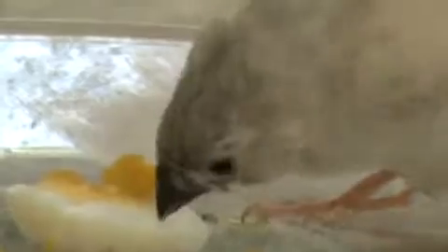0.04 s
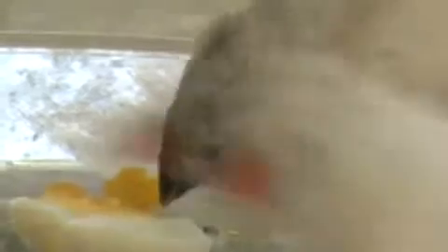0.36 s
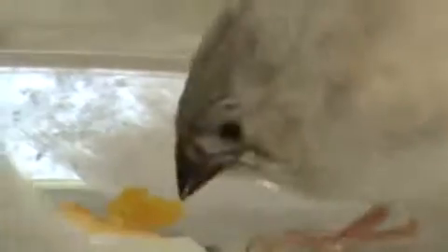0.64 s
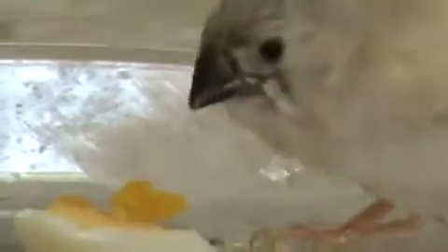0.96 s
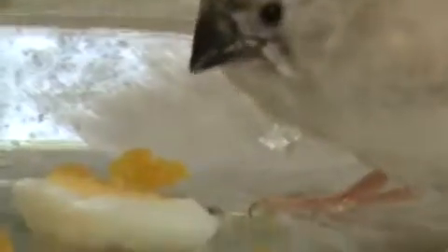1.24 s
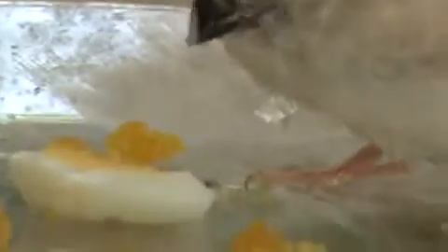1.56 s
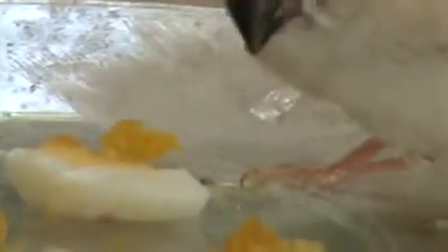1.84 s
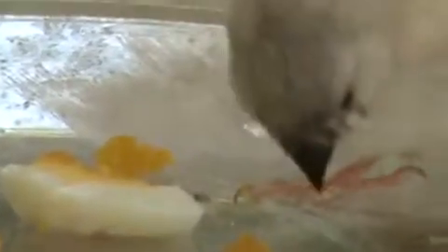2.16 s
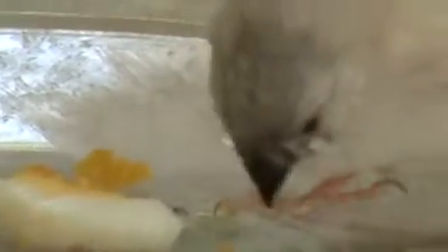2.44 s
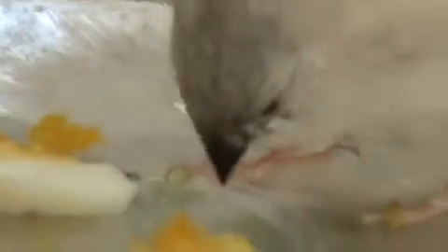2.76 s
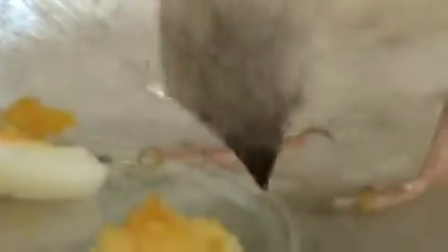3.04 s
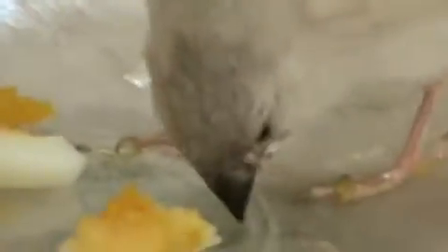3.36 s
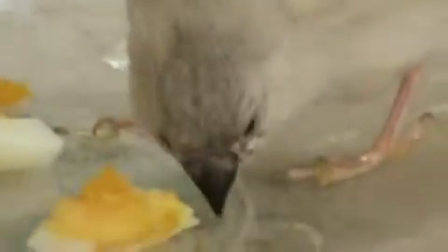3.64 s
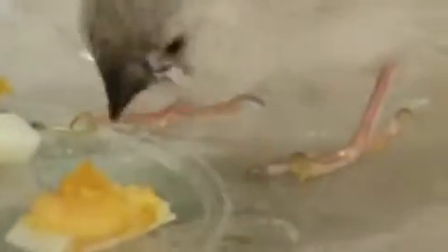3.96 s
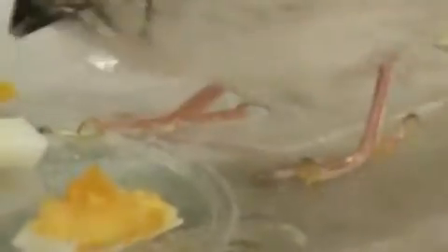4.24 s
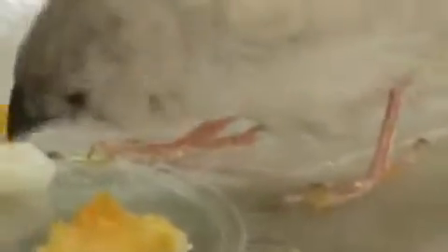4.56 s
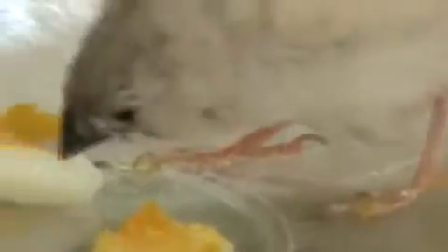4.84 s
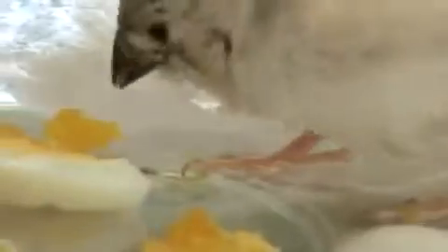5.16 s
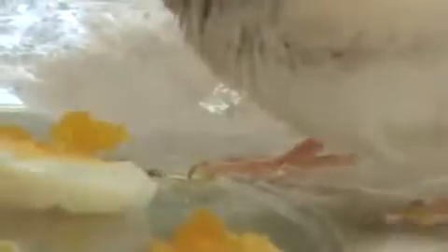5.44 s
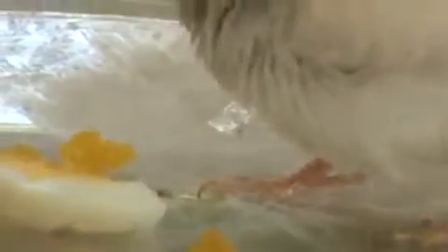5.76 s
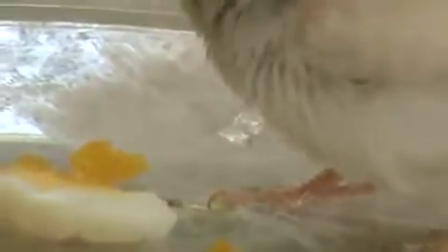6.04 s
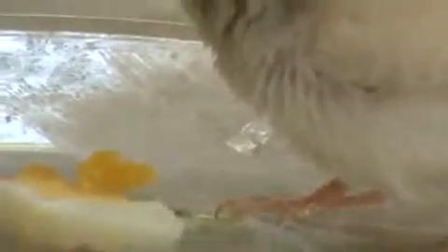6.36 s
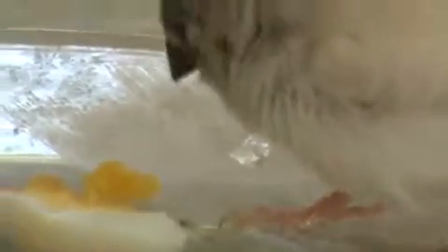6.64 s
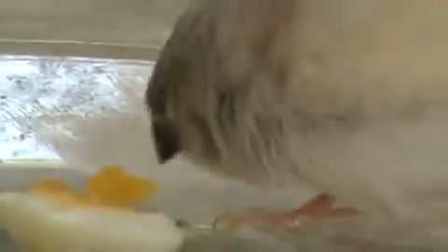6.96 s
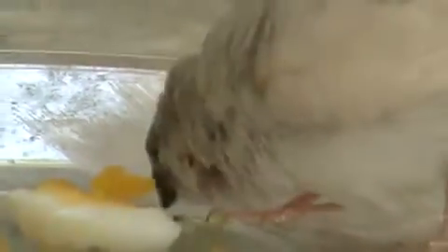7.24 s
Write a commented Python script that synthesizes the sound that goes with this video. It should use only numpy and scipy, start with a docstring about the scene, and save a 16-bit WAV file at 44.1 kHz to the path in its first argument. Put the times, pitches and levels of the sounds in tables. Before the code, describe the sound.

Indoors, a small finch repeats a quick, nasal, chirping song over light dish pecks, perch knocks and soft room air.

```python
"""A zebra finch sings indoors: runs of short nasal notes lead into its motif, a repeated tune of squeak,
buzz, chirp, whistle, rasp, two flat notes and a loud arched call. Small folds in its voice organ (the
syrinx) vibrate, and its throat and beak boost some of the overtones. A second finch answers from across
the room. Close by, a bird pecks at a dish and steps on a perch, making both ring, and shuffles its
feathers. Room air and a faint appliance hum lie underneath."""
import sys
import numpy as np
from scipy import signal
from scipy.fft import rfft, irfft, next_fast_len
from scipy.io import wavfile

SR = 44100
rng = np.random.default_rng(int(sys.argv[2]) if len(sys.argv) > 2 else 0)


def wav_record(signal):
    """Record a signal, one row per channel, as 16-bit PCM in the file named by sys.argv[1]."""
    frames = np.transpose(np.atleast_2d(signal))
    bounded = np.clip(frames, -1, 1)
    # unit amplitude maps onto the largest positive 16-bit level
    quanta = np.round(bounded * 32767).astype(np.int16)
    wavfile.write(sys.argv[1], SR, quanta)


N = 321489
TIME = np.arange(N) / SR
CUTOFF_HZ = 15900

# Levels in the tables are relative. A decay_s is the time a sound takes to fade by 60 dB.
# how alike the left and right channels are (1 = the same): frequency_hz, likeness
STEREO_LIKENESS = [(30, .99), (70, 0.99), (150, 0.94), (300, 0.61), (1000, 0.13), (5000, 0.73),
                   (9000, 0.62), (12000, 0.97)]
# how long the room echoes: frequency_hz, decay_s
ROOM_DECAY = [(200, 0.21), (1000, 0.83), (3500, 0.31), (7000, 0.29), (14000, 0.35)]
# tone colour of the room air: frequency_hz, level_db
AIR_COLOUR = [(15, -40), (25, -7.5), (120, -2.5), (242, -5.5), (384, -8), (545, -8), (624, -11.5),
              (796, -9), (911, -11), (1400, -13.5), (1740, -15.5), (2350, -21), (6560, -21), (11600, -19),
              (16000, -35.5)]
# the two tones of the appliance hum: pitch_hz, level_db
HUM_TONES = [(100, -67), (388.5, -67.5)]
# the upper hum tone swells and ebbs: time_s, level_db
HUM_SWELL = [(0, -2.5), (3.2, -7.5), (3.9, 3), (5.1, 7.5), (5.8, -4), (6.5, 5), (7.29, -10)]
# the rise and fall of the feather rustle: time_s, level_db
FEATHER_SWELL = [(5.05, -77), (5.2, -53), (5.33, -47.5), (5.44, -49.5), (5.52, -56), (5.62, -69)]
# tone colour of the feathers: frequency_hz, level_db
FEATHER_COLOUR = [(25, -19), (60, -1.5), (150, -14), (400, -10.5), (800, -11.5), (2000, -17),
                  (12000, -37.5)]

# feet and body landing on the perch: start_s, peak_db
STEPS = [(0.102, -39), (3.707, -27.5), (3.731, -28), (3.759, -35), (5.159, -48), (5.25, -33), (5.314, -38),
         (5.388, -36.5), (6.276, -32), (6.305, -28.5)]
# the beak hitting the dish: start_s, peak_db, crunch_decay_s
PECKS = [(.429, -37, 0.015), (1.662, -32, 0.02), (2.657, -32, 0.026), (3.706, -29, 0.058),
         (4.157, -35.5, 0.065), (4.195, -33.5, 0.16), (5.156, -22, 0.044), (6.494, -26.5, 0.012),
         (6.758, -35, 0.018)]
# the tones that perch and dish ring with when hit: pitch_hz, level_db, decay_s
PERCH_TONES = [(183, -10, .05), (234, 1.5, .14), (292.5, -4.5, .25), (384.6, 2, 0.31), (464, -5.5, 0.14),
               (640, -11, .08)]
DISH_TONES = [(1006, -6.5, 0.0405), (1397, 0, 0.022), (2030, -4.5, 0.023), (2280, -2, 0.024),
              (3060, -0.5, 0.017), (3930, -6.5, 0.0074), (6330, 1, 0.0047), (7750, -41, 0.0071)]

# tone colour of each kind of bird note: frequency_hz, level_db
ANSWER_COLOUR = [(600, -10), (1250, -8.5), (1850, -13), (2450, -3.5), (3100, -5.5), (3700, -7),
                 (4400, -8.5), (6000, -20), (9000, -14.5), (14000, -43)]
SHORT_COLOUR = [(500, -1), (750, -12), (1100, 7), (1600, -3), (2200, 2.5), (3200, 1), (4200, -2),
                (5200, -6.5), (6500, 0), (7800, -7.5), (10000, -6.5), (12000, -20.5), (15000, -22)]
QUICK_COLOUR = [(600, -10), (1300, 10), (1800, 5), (2500, 4), (4200, 3.5), (6500, 1.5), (8000, -6),
                (11000, -7), (13000, -18), (15500, -27.5)]
FLAT_COLOUR = [(650, -15), (1300, -6), (1950, -10), (2600, -7), (3250, 4), (4000, -0.5), (4700, -3),
               (5300, 2.5), (6000, -0.5), (6700, -10), (8500, -13), (10500, -11), (12500, -26.5),
               (15000, -36.5)]
ARCH_COLOUR = [(1000, -6), (1350, -7), (2100, -3), (2700, -7.5), (3300, -1.5), (4100, 3), (4700, -2.5),
               (5400, -0.5), (6700, -9.5), (8500, -13), (10500, -9), (12500, -22), (15000, -60)]
# A beak_hz is the frequency that the beak boosts most.
# the far bird's calls: start_s, length_s, pitch_hz, level_db, beak_hz
ANSWERS = [(0.392, 0.071, 626, -35.5, 3100), (3.446, 0.076, 622, -35.5, 3460),
           (4.325, .078, 624.5, -39, 2390), (4.759, 0.079, 621, -38.5, 2900)]
# the singer's short notes: centre_s, length_s, pitch_hz, level_db, beak_hz
SHORT_NOTES = [(.053, .018, 811, -29, 5500), (0.168, .017, 800, -30.5, 5760), (.265, 0.017, 538, -33, 5200),
               (.36, 0.014, 570.5, -27.5, 7100), (.435, 0.021, 899, -31, 5760),
               (0.506, 0.015, 823, -31, 6800), (1.222, .016, 529, -34, 4970), (1.542, .019, 527, -28, 4570),
               (1.672, .017, 847, -31, 7600), (1.786, 0.021, 862, -29, 5900),
               (1.873, 0.015, 537, -35.5, 5740), (1.971, 0.015, 574, -30, 6900),
               (2.046, 0.018, 910, -29.5, 6300), (2.114, .017, 796, -31.5, 6600),
               (2.826, .018, 518, -32, 5460), (4.652, 0.024, 901, -37.5, 4510),
               (4.806, 0.027, 952, -35.5, 5000), (4.925, .016, 820, -28.5, 6140),
               (5.026, .015, 835, -29, 6560), (5.125, .019, 535, -35, 5070), (5.222, .018, 566, -30, 6100),
               (5.29, 0.02, 863, -29.5, 5630), (5.357, 0.014, 878, -30, 6440),
               (6.07, 0.015, 528.5, -33, 4830), (6.379, .022, 516, -28, 4300),
               (6.502, .018, 818, -29, 6700), (6.592, .02, 528, -34.5, 5560), (6.689, .018, 591, -31, 6260),
               (6.761, 0.022, 893, -29.5, 6100), (6.833, 0.017, 831, -31.5, 5800)]
# when each motif reaches its whistle: time_s
WHISTLE_TIMES = [.742, 2.353, 5.594, 7.07]
# how each quick syllable moves: offset_s, pitch_hz, level_db, beak_hz, beak_width_hz, roughness (0-1)
SQUEAK = [(-.014, 2686, -47, 2600, 1400, .15), (-.006, 2510, -44, 2600, 1400, .15),
          (-.004, 2475, -41, 7350, 1800, 0.3), (.003, 2255, -33.5, 7000, 1400, 0.2),
          (.013, 1150, -32, 6680, 1800, .75), (.032, 727, -38.5, 6790, 2620, 0.78)]
BUZZ = [(-.014, 159.8, -40.5, 3600, 1500, .5), (-.002, 164.7, -34, 4200, 1400, .4),
        (.008, 168.9, -26, 4590, 1600, .35), (.015, 165, -27, 5200, 1500, .35),
        (.025, 165.3, -32.5, 5500, 1500, 1)]
CHIRP = [(-.014, 1480, -31.5, 7900, 2990, .25), (-.009, 1440, -29, 7500, 3030, .4),
         (-.003, 1330, -34, 6000, 2600, .7)]
WHISTLE = [(-.004, 5240, -39, 5200, 2500, 0.35), (0, 4040, -25, 4150, 1500, 0.29),
           (.006, 4186, -10, 4160, 1200, .06), (0.01, 4110, -14.5, 4150, 1200, .15),
           (.018, 3910, -26, 3900, 1500, 0.69)]
RASP = [(.02, 1322, -36.5, 6680, 2000, 0.49), (0.026, 1305, -20, 6770, 2600, 0.39),
        (.038, 1200, -24.5, 6660, 4400, .5), (.047, 1060, -24, 6200, 5000, .8),
        (.056, 910, -42, 6420, 5000, .8)]
# the flat notes: start_s, length_s, pitch_hz, level_db, open_beak_hz
FLAT_NOTES = [(0.853, 0.15, 675.6, -24, 5050), (1.049, .093, 649.2, -19.5, 4420),
              (2.462, 0.15, 675.6, -24, 5240), (2.658, 0.086, 654.8, -19, 4570),
              (5.702, 0.15, 675, -23.5, 4950), (5.899, 0.082, 650, -18.5, 4150),
              (7.179, 0.13, 672.4, -23.5, 5050)]
# the loud arched calls: start_s, length_s, top_pitch_hz, level_db
ARCHED_CALLS = [(1.308, 0.14, 1375, -15), (2.907, .146, 1359, -14.5), (6.147, 0.14, 1374, -14.5)]
# how the beak moves during an arched call: offset_s, beak_hz
ARCH_BEAK = [(0, 6600), (.008, 6200), (.02, 4600), (.05, 4050), (.08, 4800), (.118, 4750), (.146, 3600)]


def from_db(db):
    """Turn decibels into a number to multiply by."""
    return 10 ** (np.asarray(db) / 20)


def rms_one(x):
    """Scale a signal so that its average power is 1."""
    return x / np.sqrt(np.mean(np.abs(x) ** 2) + 1e-20)


def at_hz(table, hz):
    """Read between the rows of a frequency table, giving each octave equal space."""
    row_hz, value = np.transpose(table)
    return np.interp(np.log(np.maximum(hz, 1)), np.log(row_hz), value)


def coloured_noise(colour):
    """Two unrelated noises with the same tone colour."""
    size = next_fast_len(N)
    gain = from_db(at_hz(colour, np.arange(size // 2 + 1) * SR / size))
    white = rng.standard_normal((2, N))
    return rms_one(irfft(rfft(white, size) * gain, size)[:, :N])


def flutter(shape, rate_hz):
    """A random wobble of typical size 1, up to about the given rate."""
    lowpass = signal.butter(2, min(rate_hz, SR / 4), fs=SR, output="sos")
    return rms_one(signal.sosfilt(lowpass, rng.standard_normal(shape)))


def add(track, start_s, sound):
    """Mix a sound into a track at the given time."""
    at = round(start_s * SR)
    part = sound[max(-at, 0):max(N - at, 0)]
    track[max(at, 0):max(at, 0) + len(part)] += part


def stereo(mid, side):
    """Blend two unrelated signals into left and right channels that are partly alike."""
    size = next_fast_len(len(mid))
    alike = np.clip(at_hz(STEREO_LIKENESS, np.arange(size // 2 + 1) * SR / size), -1, 1)
    shared = rfft(mid, size) * np.sqrt((1 + alike) / 2)
    opposite = rfft(side, size) * np.sqrt((1 - alike) / 2)
    return irfft([shared + opposite, shared - opposite], size)[:, :len(mid)]


def room(dry, near_db, tail_db, near_decay_s=0.064):
    """Add quick echoes from the cage and nearby walls, then the room's tail, longest in the mid range."""
    t = np.arange(int(0.7 * SR)) / SR
    edges_hz = np.geomspace(100, CUTOFF_HZ, num=9)
    white = rng.standard_normal((2, 2, len(t)))
    tail = 0
    for k, band in enumerate(zip(edges_hz, edges_hz[1:])):
        noise = signal.sosfilt(signal.butter(2, band, "band", fs=SR, output="sos"), white[k % 2])
        decay_s = at_hz(ROOM_DECAY, np.sqrt(band[0] * band[1]))
        tail = tail + noise * from_db(-60 * t / decay_s)
    near = rng.standard_normal((2, len(t))) * (t > 0.001) * from_db(-60 * t / near_decay_s)
    echo = from_db(near_db) * rms_one(near) + from_db(tail_db) * rms_one(tail * (t > 0.008))
    echo = stereo(*echo) / np.sqrt(len(t))
    return dry + signal.fftconvolve(dry[None], echo, axes=1)[:, :N]


def room_air(level_db=-54.5):
    """The steady, soft rush of air in the room."""
    return stereo(*(from_db(level_db) * coloured_noise(AIR_COLOUR)))


def appliance_hum():
    """Two faint, slightly wavering tones; the upper one swells and ebbs."""
    mains, upper = [from_db(db) * np.sqrt(2) * np.sin(2 * np.pi * hz * TIME + 0.5 * flutter(N, 6.4))
                    for hz, db in HUM_TONES]
    return mains + upper * from_db(np.interp(TIME, *np.transpose(HUM_SWELL)))


def feather_shuffle(flicker_db=4.7):
    """Feathers rustle once: a swell of noise with a flickering level."""
    level_db = np.interp(TIME, *np.transpose(FEATHER_SWELL)) + flicker_db * flutter(N, 30)
    return stereo(*(from_db(level_db) * coloured_noise(FEATHER_COLOUR)))


def strikes(hits, tones, gain_db, crunch_db):
    """Each hit rings an object's tones in a new random balance, over a short gritty crunch."""
    out = np.zeros(N)
    t = np.arange(SR // 3) / SR
    for start_s, peak_db, crunch_decay_s in hits:
        ring = 0
        for hz, db, decay_s in tones:
            fade = from_db(db + rng.normal(0, 4.6) - 60 * t / decay_s)
            ring = ring + fade * np.sin(2 * np.pi * hz * t) * rng.choice([-1, 1])
        crunch = from_db(crunch_db - 60 * t / crunch_decay_s) * flutter(len(t), 7100)
        hit = ring + crunch
        add(out, start_s, from_db(peak_db + gain_db) * hit / np.abs(hit).max())
    return out


def perch_steps(scuff_s=0.071):
    """Feet and body bump the perch, which gives a low knock with a scuff."""
    return strikes([(s, db, scuff_s) for s, db in STEPS], PERCH_TONES, gain_db=-7.5, crunch_db=-6.0)


def dish_pecks():
    """A beak crunches food and makes the dish ring briefly."""
    return strikes(PECKS, DISH_TONES, gain_db=1.0, crunch_db=-4.0)


def note_span(start_s, end_s, edge_s=0.002, ramp=1.6):
    """The times within a note, and a gate that turns it on and off without a click."""
    t = np.arange(start_s - edge_s, end_s + edge_s, 1 / SR)
    return t, np.clip(np.minimum(t - t[0], t[-1] - t) / (ramp * edge_s), 0, 1)


def scoop(t, depth, settle_s):
    """The share of full pitch as a note slides up; with time reversed, a droop at its end."""
    return 1 - depth * np.exp(-t / settle_s)


def breath_db(t, attack_s, release_s, depth_db):
    """Air pressure rises, holds and sinks, so a note is quieter at both ends."""
    rising = np.maximum(1 - t / attack_s, 0)
    sinking = np.maximum(1 - (t[-1] - t) / release_s, 0) ** 1.42
    return -depth_db * (rising + sinking)


def beak(centre_hz, width_hz, leak_db=-25):
    """Beak and throat form a hollow that favours one band of frequencies; the rest leaks through."""
    return lambda hz: from_db(leak_db) + 1 / (1 + (2 * (hz - centre_hz) / width_hz) ** 2)


def syrinx(pitch_hz, rough, colour, throat, jitter=0.027, phase_spread=0.79, rasp_hz=330):
    """Vibrating folds make a stack of harmonics (multiples of the pitch), shaped by the throat."""
    rough = np.clip(rough, 0, 1)
    pitch_hz = pitch_hz * (1 + jitter * rough * flutter(len(pitch_hz), 277))
    harmonic = np.arange(1, int(CUTOFF_HZ / pitch_hz.min()) + 1)[:, None]
    hz = harmonic * pitch_hz
    gain = from_db(at_hz(colour, hz)) * throat(hz) * (hz < CUTOFF_HZ)
    gain = gain / np.sqrt(np.sum(gain ** 2, axis=0) / 2 + 1e-20)   # keep the power steady
    phase = 2 * np.pi * harmonic * np.cumsum(pitch_hz) / SR
    phase += phase_spread * rng.standard_normal(harmonic.shape)
    clean = np.sqrt(1 - rough ** 2) * np.cos(phase)
    # uneven vibration smears each harmonic into a band of noise
    smear = flutter(hz.shape, rasp_hz) * np.cos(phase) + flutter(hz.shape, rasp_hz) * np.sin(phase)
    return np.sum(gain * (clean + rough * smear / np.sqrt(2)), axis=0)


def far_answers(rough=0.32):
    """The far bird's soft, dull calls: each slides up, swells slowly and droops at the end."""
    out = np.zeros(N)
    for start_s, length_s, hz, db, beak_hz in ANSWERS:
        t, gate = note_span(0, length_s)
        droop = scoop(t[-1] - t, depth=0.055, settle_s=0.0096)
        pitch_hz = hz * scoop(t, depth=0.18, settle_s=0.015) * droop
        voice = syrinx(pitch_hz, rough, ANSWER_COLOUR, beak(beak_hz, width_hz=1200, leak_db=-3))
        swell_db = breath_db(t, attack_s=0.059, release_s=0.028, depth_db=11)
        add(out, start_s + t[0], gate * from_db(db + swell_db) * voice)
    return out


def short_notes(lowest_hz=510, highest_hz=1600, slack_hz=520.5, taut_hz=835, lead_s=0.0014):
    """Each note swells and fades as its pitch drops; higher notes drop faster and sound hoarser."""
    out = np.zeros(N)
    for centre_s, length_s, hz, db, beak_hz in SHORT_NOTES:
        t = np.arange(-2 * length_s, 2 * length_s, 1 / SR)
        slope_s = np.where(t < -lead_s, 0.94, 1.49) * length_s   # quick rise, slower fade
        envelope = np.exp(-2 * np.abs((t + lead_s) / slope_s) ** 1.76)
        width_hz = np.interp(hz, [slack_hz, taut_hz], [4940, 5000])
        octaves_per_s = np.interp(hz, [slack_hz, taut_hz], [6.5, 54])
        rough = np.interp(hz, [slack_hz, taut_hz], [0.3, 0.6])
        pitch_hz = np.clip(hz * 2 ** (-octaves_per_s * t), min(lowest_hz, 0.98 * hz), highest_hz)
        # the beak closes as the note ends, and the voice breaks up
        closing_beak = beak(beak_hz * 2 ** (-7 * t), width_hz)
        hoarse = rough * (1 + 0.35 * np.tanh(t / length_s))
        # tight folds at high pitch put more into the lowest harmonic
        low_boost = 0.37 * (pitch_hz / highest_hz) ** 2
        throat = lambda f: closing_beak(f) + low_boost * (f < 1.5 * pitch_hz)
        voice = syrinx(pitch_hz, hoarse, SHORT_COLOUR, throat, jitter=0.0491, phase_spread=1.0)
        add(out, centre_s + t[0], from_db(db) * envelope * voice)
    return out


def quick_syllables(squeak_lead_s=0.1505, buzz_lead_s=0.094):
    """The same five learnt sounds open every motif; in the whistle the folds give an almost pure tone."""
    out = np.zeros(N)
    syllables = (squeak_lead_s, SQUEAK), (buzz_lead_s, BUZZ), (0, CHIRP), (0, WHISTLE), (0, RASP)
    for whistle_s in WHISTLE_TIMES:
        for lead_s, rows in syllables:
            offset_s, *columns = np.transpose(rows)
            t, gate = note_span(offset_s[0], offset_s[-1], edge_s=0.0012, ramp=1.35)
            pitch_hz, db, beak_hz, width_hz, rough = [np.interp(t, offset_s, c) for c in columns]
            throat = beak(beak_hz, width_hz, leak_db=-31)
            voice = syrinx(pitch_hz, rough, QUICK_COLOUR, throat,
                           jitter=0.05, phase_spread=0.73, rasp_hz=480)
            add(out, whistle_s - lead_s + t[0], gate * from_db(db) * voice)
    return out


def flat_notes(closed_hz=3200, gain_db=-1.0, waver=0.0044):
    """Nasal notes that start hoarse, slide up and settle while the beak opens and closes once."""
    out = np.zeros(N)
    for start_s, length_s, hz, db, open_hz in FLAT_NOTES:
        t, gate = note_span(0, length_s)
        droop = scoop(t[-1] - t, depth=0.068, settle_s=0.0078)
        pitch_hz = hz * scoop(t, depth=0.13, settle_s=0.019) * droop * (1 + waver * flutter(len(t), 40))
        opening = np.abs(np.sin(np.pi * t / length_s)) ** 1.5
        throat = beak(closed_hz + (open_hz - closed_hz) * opening, width_hz=2550, leak_db=-15)
        rough = 0.18 + 0.34 * np.exp(-t / 0.033)
        voice = syrinx(pitch_hz, rough, FLAT_COLOUR, throat, jitter=0.019, phase_spread=0.8)
        swell_db = breath_db(t, attack_s=0.025, release_s=0.026, depth_db=11.5)
        add(out, start_s + t[0], gate * from_db(db + gain_db + swell_db) * voice)
    return out


def arched_calls(top_s=0.04, fall=0.28, slack_db=-5.0, waver=0.006):
    """A loud call that rises and falls in pitch: clear at the top, rougher and weaker on either side."""
    out = np.zeros(N)
    for start_s, length_s, top_hz, db in ARCHED_CALLS:
        t, gate = note_span(0, length_s)
        descent = np.maximum(t - top_s, 0) / (length_s - top_s)
        height = scoop(t, depth=0.145, settle_s=0.012) * (1 - fall * descent ** 2.5)
        pitch_hz = top_hz * height * (1 + waver * flutter(len(t), 70))
        slack = np.tanh((1 - height) / 0.058)   # near 0 at the top, near 1 well below it
        rough = 0.036 + 0.28 * slack
        beak_hz = np.interp(t, *np.transpose(ARCH_BEAK))
        throat = beak(beak_hz, width_hz=2100 * (1 + 2.1 * rough), leak_db=-20.5)
        voice = syrinx(pitch_hz, rough, ARCH_COLOUR, throat, jitter=0.039, rasp_hz=448)
        swell_db = breath_db(t, attack_s=0.05, release_s=0.0044, depth_db=2.5)
        add(out, start_s + t[0], gate * from_db(db + slack_db * slack + swell_db) * voice)
    return out


def scene(singer_pan_db=0.75, others_pan_db=0.5):
    """The singer is near and a little to the left; the far bird has the most room echo."""
    song = short_notes() + quick_syllables() + flat_notes() + arched_calls()
    knocks = dish_pecks() + perch_steps()
    leftward = np.array([[1], [-1]])
    singer = room(song, near_db=-4.5, tail_db=-14.5) * from_db(singer_pan_db * leftward)
    far_bird = from_db(-0.5) * room(far_answers(), near_db=-0.5, tail_db=-6.0)
    feeding_bird = room(knocks, near_db=-4.0, tail_db=-7.5)
    others = (far_bird + feeding_bird) * from_db(others_pan_db * leftward)
    return room_air() + feather_shuffle() + appliance_hum() + others + singer


def record(dry):
    """Cut away the very highest treble with a steep filter."""
    return signal.sosfilt(signal.ellip(10, 0.1, 80, CUTOFF_HZ, fs=SR, output="sos"), dry)


dry = scene()
out = record(dry)
wav_record(out)
```